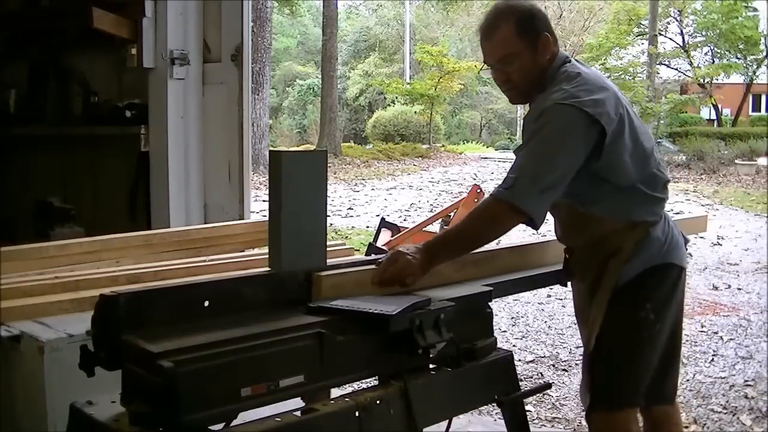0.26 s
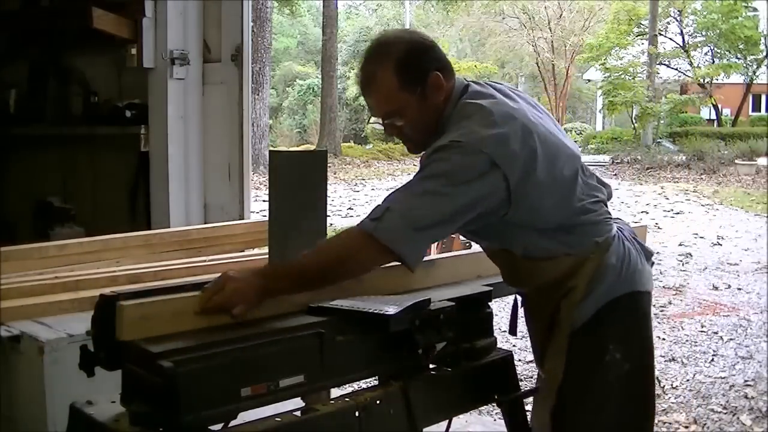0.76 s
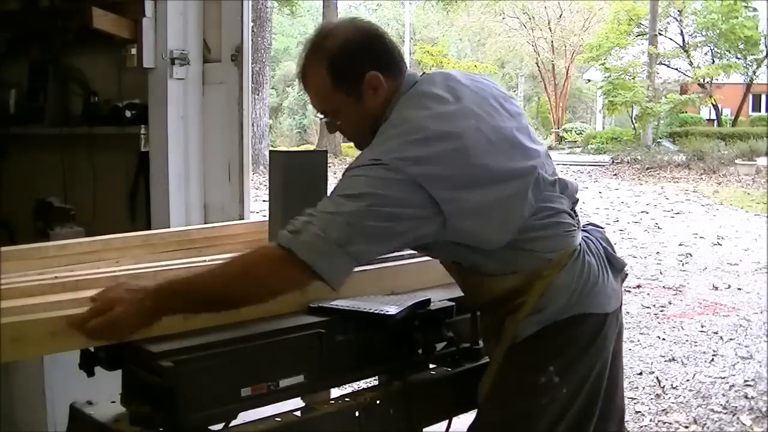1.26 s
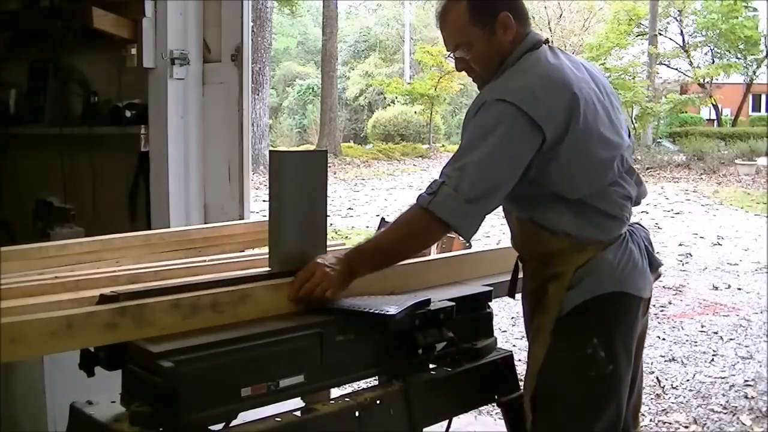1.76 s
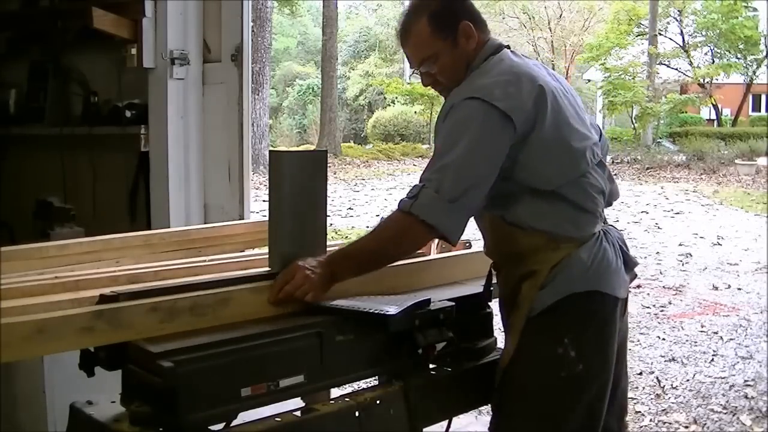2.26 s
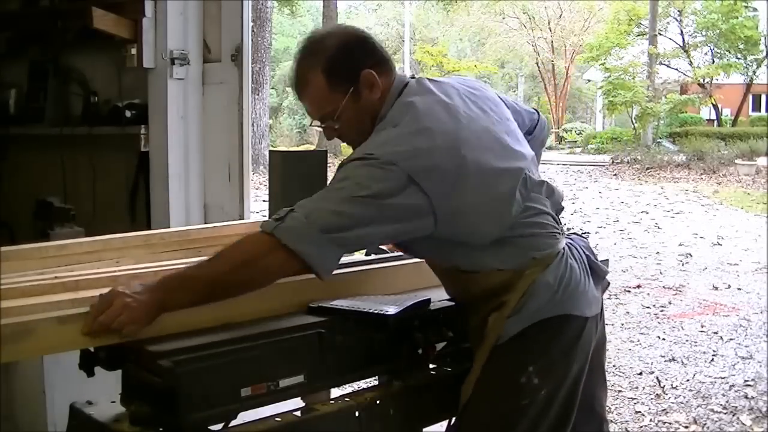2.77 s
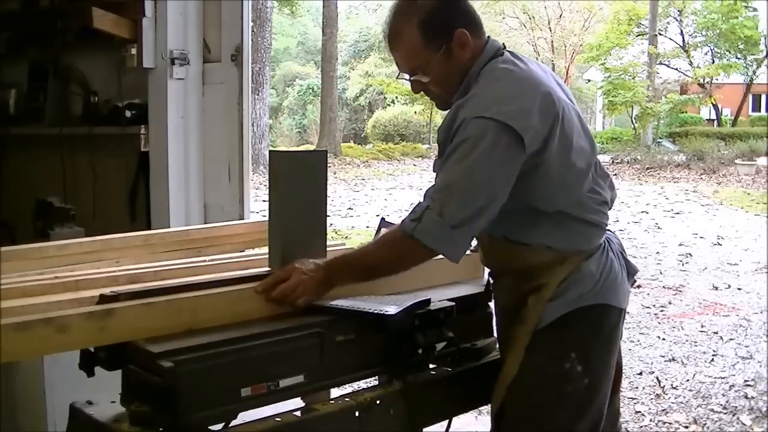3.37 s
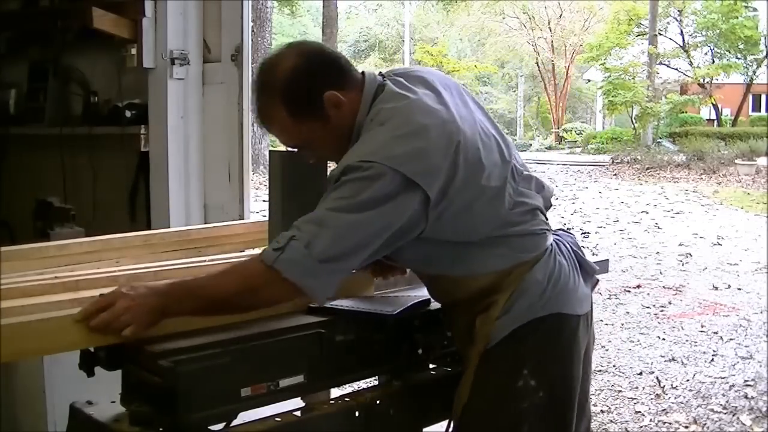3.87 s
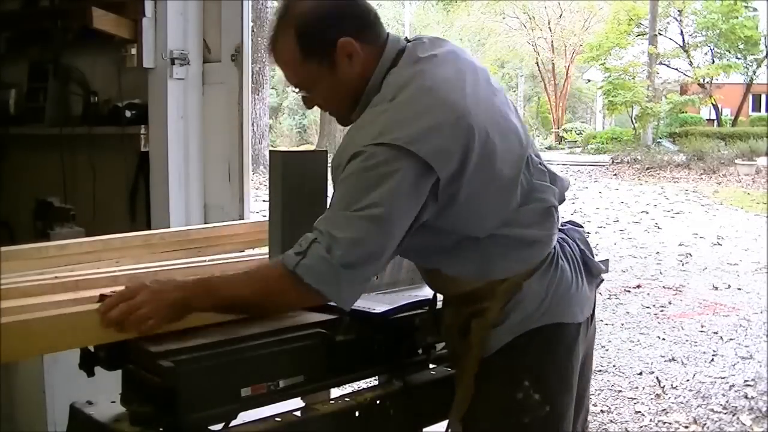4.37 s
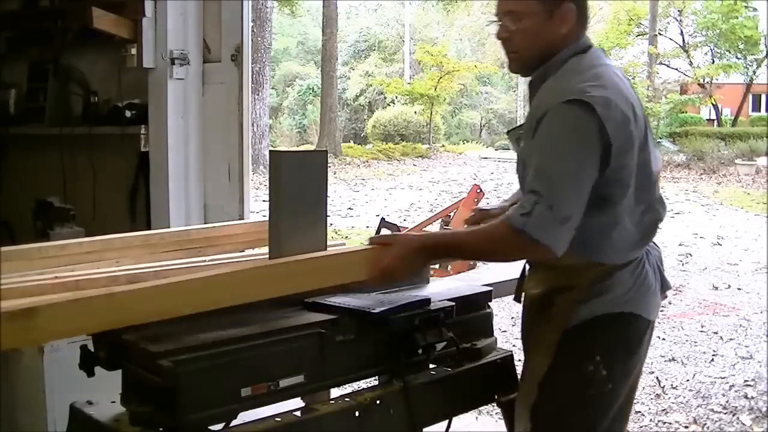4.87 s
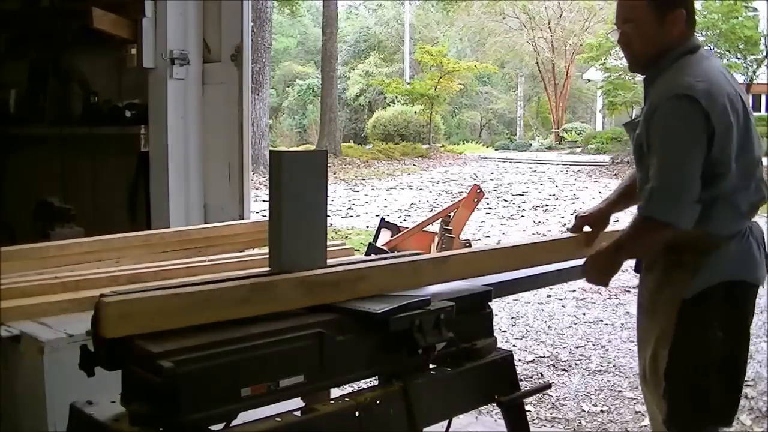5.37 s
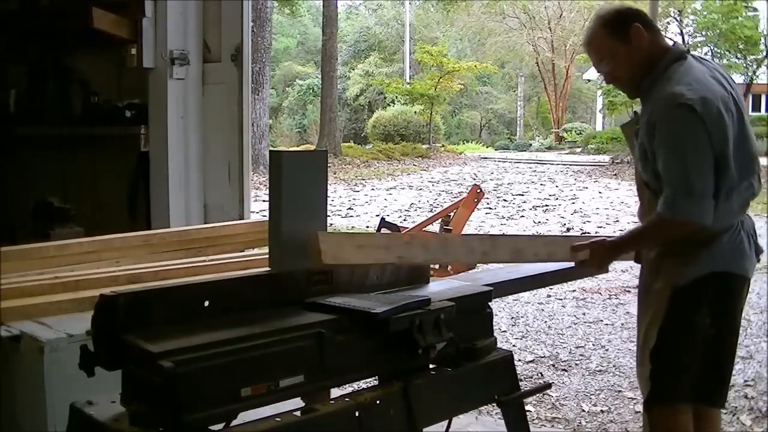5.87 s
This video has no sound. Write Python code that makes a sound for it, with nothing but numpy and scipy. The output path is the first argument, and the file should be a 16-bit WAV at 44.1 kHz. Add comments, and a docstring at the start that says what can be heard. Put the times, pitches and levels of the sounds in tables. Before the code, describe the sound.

A jointer whines steadily in an open shed while a long board is pushed over its knives in three harsh, ringing, hissing cuts, then knocks and scrapes on iron.

```python
"""Jointer planing a long board

A belt-driven jointer with a three-knife head whines in an open shed: tones locked to the head over filtered noise.
A board is fed in three pushes that sag the speed; knife blows drive board ring, chip spray, singing and snaps.
Afterwards the lifted board squeaks, knocks and scrapes on the iron table: band noise and decaying modes.
The recorder's limiter pulls the whine down under sharp ticks and knocks."""
import sys
import numpy as np
from scipy import signal
from scipy.fft import rfft, irfft
from scipy.io import wavfile
from scipy.ndimage import uniform_filter1d

SR = 44100
rng = np.random.default_rng(int(sys.argv[2]) if len(sys.argv) > 2 else 0)


def inscribe(sig):
    """Save sig as 16-bit PCM at rate SR to the path in sys.argv[1].

    A 1-D sig is mono; a 2-D sig holds one channel per row.
    Samples are clipped to [-1, 1] before scaling.
    """
    pcm = np.round(np.clip(np.atleast_2d(sig).T, -1, 1) * 32767)
    wavfile.write(sys.argv[1], SR, pcm.astype(np.int16))


N = 269451


def amp(db):
    """Gain of a level in dB."""
    return 10 ** (np.asarray(db) / 20)


def evened(x):
    """Scales to an rms of one."""
    return x / np.sqrt(np.mean(x ** 2) + 1e-20)


def wander(count, size):
    """Slow random drift of unit rms: noise averaged over size samples."""
    return evened(uniform_filter1d(rng.standard_normal(count), size=size))


def curve(rows, outside=None):
    """Interpolates the columns of a table to one value a sample."""
    s, *columns = np.transpose(rows)
    t = np.arange(N) / SR
    return [np.interp(t, s, column, outside, outside) for column in columns]


def lift(hz, modes):
    """The dB that a set of modes adds at each frequency."""
    return sum(up_db / (1 + (2 * (hz - mode_hz) / width_hz) ** 2) for mode_hz, width_hz, up_db in modes)


def coloured(x, points, patch_db, size, modes=()):
    """Filters by a spectrum and modes, overlaid with random patches of size (bins, frames)."""
    hz, _, z = signal.stft(x, SR, nperseg=1024, noverlap=768)
    f, db = np.transpose(points)
    shape_db = np.interp(np.log(hz + 1), np.log(f), db) + lift(hz, modes)
    patches = uniform_filter1d(rng.standard_normal(z.shape), size[0], axis=0)
    patches = evened(uniform_filter1d(patches, size[1], axis=1))
    z = z * amp(shape_db[:, None] + patch_db * patches)
    return evened(signal.istft(z, SR, nperseg=1024, noverlap=768)[1][:N])


def band(x, lo_hz, hi_hz):
    """Second-order band-pass design."""
    return signal.sosfilt(signal.butter(2, [lo_hz, hi_hz], "band", fs=SR, output="sos"), x)


def add(mix, s, sound):
    """Mixes a sound in at second s."""
    part = mix[round(s * SR):][:len(sound)]
    part += sound[:len(part)]


def stretch(s, length_s):
    """Sample range starting at second s."""
    return slice(round(s * SR), round((s + length_s) * SR))


# knife whine, 6 x head speed: t/s, f/Hz
WHINE_HZ = [(0, 907.99), (0.28, 904.73), (0.4, 896.85), (0.75, 890.77), (1.1, 893.39), (1.32, 905.24),
            (2.2, 904.52), (2.3, 897.79), (2.5, 897.28), (2.78, 891.28), (3.02, 906.3), (3.4, 904.13),
            (3.5, 896.63), (3.82, 892.04), (4.1, 896.45), (4.2, 907.25), (4.4, 906.2), (6.11, 906.31)]
BELT_TURNS, BELT_WOBBLE_TURNS = 9.225, .0165  # head turns a lap; lead and lag of the head
HEAD_START_TURNS, BELT_START_LAPS = .44, -.18


def head():
    """Head turns and belt angle in rad; the belt joint hurries and slows the head once a lap."""
    turns = np.cumsum(curve(WHINE_HZ)[0]) / (6 * SR)
    lap = 2 * np.pi * (turns / BELT_TURNS + BELT_START_LAPS)
    return HEAD_START_TURNS + turns + BELT_WOBBLE_TURNS * np.sin(lap), lap


# head tones: multiple of head speed, level/dB re WHINE_DB
HEAD_ORDERS = [(1, -44), (2, -32), (3, -13), (4, -27.5), (5, -22), (6, 1.5), (7, -34), (8, -26.5), (9, -13),
               (10, -18.5), (11, -23.5), (12, -15), (13, -33.5), (14, -20.5), (15, -18), (16, -19),
               (17, -20), (18, -19.5), (19, -24.5), (20, -31), (21, -20), (22, -59), (23, -28), (24, -43.5)]
# swell once a belt lap: multiple of head speed: depth (negative = against the hurry)
ORDER_THROBS = {3: 0.15, 6: 0.17, 7: 0.37, 9: -0.46}
# motor tones: f/Hz, level/dB re WHINE_DB
MOTOR_TONES = [(129, -46.5), (242, -36.5), (592, -20.5), (829, -21.5), (1001, -18.5), (1072, -21),
               (1184, -26)]
# spectrum of motor roar and stirred air: f/Hz, relative level/dB per Hz
AIR_SPECTRUM = [(90, -65.5), (150, -38), (300, -24.5), (400, -22), (520, -15), (800, -13.5), (1000, -10),
                (1300, -14), (2300, -15), (3400, -19), (8300, -23), (15500, -28.5)]
WHINE_DB = -15
COVER_DB = -0.5  # board over the knives muffles the roar


def idle(turns, lap):
    """Tones of head and motor, each a little unsteady, over the roar of motor and air."""
    partials = [(k * turns, db, ORDER_THROBS.get(k, 0)) for k, db in HEAD_ORDERS]
    partials += [(hz * np.arange(N) / SR, db, 0) for hz, db in MOTOR_TONES]
    tones = np.zeros(N)
    for cycles, db, depth in partials:
        waver = 1 + depth * np.cos(lap) + 0.19 * wander(N, 1500)
        tones += amp(db) * waver * np.sqrt(2) * np.cos(2 * np.pi * (cycles + rng.random()))
    chop = 1 + 0.05 * np.cos(2 * np.pi * turns)  # the knives chop the air
    roar = coloured(chop * rng.standard_normal(N), AIR_SPECTRUM, patch_db=2.5, size=(10, 12))
    covered = curve([(FEED_ROWS[0][0], 1), (FEED_END_S, 1)], 0)[0]
    covered = uniform_filter1d(covered, size=2000)
    return amp(WHINE_DB) * (tones + amp(-3.5 + COVER_DB * covered) * roar)


# wood slipping on iron: t/s, level/dB, f/Hz, second f/Hz, rise/s, t60/s
SQUEAK_ROWS = [(.002, -17.5, 7860, 7370, 0.0013, 0.17), (4.626, -23, 14500, 13500, 0.0054, 0.034),
               (4.635, -12.5, 12300, 11030, 0.016, 0.16), (4.769, -14, 9705, 8870, 0.00136, 0.12),
               (4.772, -18.5, 7540, 7240, .002, 0.063), (4.842, -15, 5450, 5450, 0.003, 0.109)]


def squeaks():
    """Short slips of wood on iron: two narrow noise bands over a broader scuff."""
    out, t = np.zeros(N), np.arange(9000) / SR
    for s, db, pitch_hz, second_hz, rise_s, t60_s in SQUEAK_ROWS:
        noise = rng.standard_normal(len(t))
        pair = sum(evened(band(noise, .97 * f, 1.03 * f)) for f in (pitch_hz, second_hz))
        scuff = .5 * evened(band(noise, .7 * second_hz, min(1.3 * pitch_hz, 16000)))
        swell = np.where(t < rise_s, t / rise_s, amp(-60 * (t - rise_s) / t60_s))
        add(out, s, amp(db) * (pair + scuff) * swell)
    return out


# board against a running tone of the head: t/s, length/s, multiple of head speed, level/dB
SING_ROWS = [(0.293, 0.078, 12, -15), (0.304, 0.1, 27, -12.5), (0.282, 0.093, 33, -17),
             (0.278, .06, 36, -20), (0.427, .12, 41, -19.5), (0.475, 0.12, 32, -18), (.8, 0.21, 18, -14.5),
             (0.387, 0.21, 18, -13), (0.43, 0.2, 23, -14.5), (0.583, 0.158, 15, -9.5),
             (0.611, 0.057, 18, -14.5), (0.643, 0.1, 41, -18), (0.694, 0.048, 32, -8),
             (0.752, 0.098, 23, -16), (0.888, 0.2, 32, -18), (0.895, 0.12, 15, -18),
             (0.975, 0.175, 29, -18), (1.055, 0.23, 23, -11), (1.452, 0.029, 16, -17),
             (2.38, 0.324, 32, -20), (2.41, 0.172, 23, -12), (2.542, 0.057, 18, -17),
             (3.077, 0.36, 15, -22.5), (3.402, 0.19, 23, -12), (3.704, 0.0454, 15, -11),
             (3.706, 0.0616, 18, -11), (3.754, 0.087, 23, -11.5), (4.0, 0.12, 15, -16),
             (4.04, 0.096, 17, -15)]


def sings(turns):
    """A head tone meets a mode of the sliding board and sings out, fluttering."""
    out = np.zeros(N)
    for s, length_s, k, db in SING_ROWS:
        span = stretch(s, length_s)
        flutter = 1 + .2 * wander(len(turns[span]), 300)
        swell = flutter * signal.windows.tukey(len(flutter), .6)
        out[span] += amp(db) * np.sqrt(2) * swell * np.cos(2 * np.pi * k * turns[span])
    return out


# pushes and rests, each until the next:
# t/s, ring level/dB at start, at end, spray level/dB at start, at end, share of the proud knife/0-1
FEED_ROWS = [(.285, -8, -3, -6, -4.5, 0.39), (1.08, -9, -7.5, 1.5, -3.5, 0.7),
             (1.223, -16, -14.5, -17, -25, 0.64), (2.218, -7, -4.5, -2.5, -4, 0.63),
             (2.915, -16.5, -11.5, -20.5, -17.5, 0.73), (3.415, -4.5, -6, -2, -6, 0.56)]
FEED_END_S, BITE_S, EASE_S = 4.135, 0.022, 0.0413  # board leaves the knives; push bites; push eases off


def feed():
    """Board ring dB, spray dB and proud-knife share as the push bites and eases off."""
    rows = [(FEED_ROWS[0][0], -24, -24, FEED_ROWS[0][-1])]
    ends = [row[0] for row in FEED_ROWS[1:]] + [FEED_END_S]
    for (s, ring_db, ring_end_db, spray_db, spray_end_db, proud), end in zip(FEED_ROWS, ends):
        change_s = BITE_S if spray_db > rows[-1][2] else EASE_S
        rows += [(s + change_s, ring_db, spray_db, proud), (end, ring_end_db, spray_end_db, proud)]
    return curve(rows + [(FEED_END_S + BITE_S, -45, -45, proud)], -90)


def knife_passes(turns):
    """Samples of the three knife passes a turn, and which are the proud knife's."""
    passes = np.floor(3 * turns)
    at = np.flatnonzero(np.diff(passes)) + 1
    return at, passes[at] % 3 == 0


def ticks_and_chips(ticks, proud):
    """Ticks that start bright, a puff of chips after each, and steady noise as the knives share the cut."""
    t = np.arange(300) / SR
    chips = signal.oaconvolve(ticks, amp(-60 * t / 0.0074))[:N] * rng.standard_normal(N)
    steady = np.sqrt(uniform_filter1d(ticks ** 2, size=2000) + 1e-9)
    crack = signal.chirp(t[:24], 15000, t[23], 5000) * np.hanning(24)
    cracks = signal.oaconvolve(ticks, crack / np.linalg.norm(crack))[:N]
    even = 1.4 - proud
    spray = (0.95 * cracks + 0.64 * chips) / steady + even * rng.standard_normal(N)
    return spray / np.sqrt(1 + even ** 2)


# light cut exciting a fixed band of the machine: t/s, length/s, f/Hz, width/Hz, level/dB
SCREECH_ROWS = [(1.4, .84, 5380, 200, -28), (3.05, .4, 5380, 260, -28), (1.36, .2, 11800, 1200, -26),
                (1.5, .22, 10700, 1000, -27), (3.1, .3, 11200, 1200, -29)]


def screeches(excitation):
    """Fixed machine bands rung by the cut."""
    out = np.zeros(N)
    for s, length_s, hz, width_hz, db in SCREECH_ROWS:
        span = stretch(s, length_s)
        rung = evened(band(excitation[span], hz - width_hz / 2, hz + width_hz / 2))
        out[span] += amp(db) * rung * signal.windows.tukey(len(rung), .4)
    return out


# spectrum of the ringing board: f/Hz, relative level/dB per Hz
BOARD_SPECTRUM = [(600, -29), (1100, -9), (1500, -2.5), (2100, 0), (3300, -3), (5500, -5.5), (9000, -10.5),
                  (12000, -10)]
# spectrum of ticks and chips: f/Hz, relative level/dB per Hz
SPRAY_SPECTRUM = [(2400, -44), (4000, -31), (6000, -6.5), (9000, 0), (10500, -3), (12800, 4), (14500, -4.5),
                  (16000, -2.5)]
# modes of table, fence and board: f/Hz, width/Hz, level/dB
BLOW_MODES = [(2180, 240, 2.5), (2725, 500, 2.5), (3354, 40, 13), (3867, 140, 5), (4610, 230, 2),
              (5460, 183, 5.5)]


def cut(turns):
    """Three knife blows a turn, one knife proud, ring the board and throw chips."""
    ring_db, spray_db, proud = feed()
    proud = np.clip(proud, 0, 1)
    at, first = knife_passes(turns)
    luck = rng.standard_normal((len(at), 2))
    blows, ticks = np.zeros((2, N))
    blows[at] = np.where(first, 1, .2) * amp(2 * luck[:, 0])
    ticks[at] = np.where(first, 1, 1 - proud[at]) * amp(2 * luck[:, 1])
    spray = ticks_and_chips(ticks, proud)
    spread = irfft(np.exp(2j * np.pi * rng.random(129)))  # wood scatters a blow over some ms
    rattle = evened(signal.oaconvolve(blows, spread)[:N]) + .45 * rng.standard_normal(N)
    ring = coloured(rattle, BOARD_SPECTRUM, patch_db=3.5, size=(3, 20), modes=BLOW_MODES)
    hiss = coloured(spray, SPRAY_SPECTRUM, patch_db=1.2, size=(12, 30))
    return amp(ring_db) * ring + amp(spray_db) * hiss + screeches(rattle + spray)


# hard grain: t/s, level/dB
SNAP_ROWS = [(.745, 8), (.944, 2.5), (1.092, 11), (1.193, 18), (1.22, 10), (2.227, 13), (2.241, 14.5),
             (2.254, 11), (2.288, 15), (2.361, 13), (2.408, 19), (2.495, 11), (2.508, 17), (2.569, 15),
             (2.615, 21), (2.621, 23), (2.817, 17.5), (2.911, 7), (3.429, 5), (3.496, 18), (3.576, 16),
             (3.617, 16.5), (3.697, 15.5), (3.757, 11), (3.771, 18.5), (3.805, 17.5), (3.905, 12),
             (4.127, 8)]


def snaps(turns):
    """Hard grain makes a knife snap: decaying band noise on the nearest pass of the proud knife."""
    out, t = np.zeros(N), np.arange(300) / SR
    at, first = knife_passes(turns)
    proud_at = at[first]
    for s, db in SNAP_ROWS:
        nearest = proud_at[np.argmin(abs(proud_at - s * SR))]
        snap = band(rng.standard_normal(len(t)) * amp(-60 * t / .002), 9000, 15700)
        add(out, nearest / SR, amp(db) * 2 * snap / np.linalg.norm(snap))
    return out


# board against iron: t/s, level/dB, tilt/dB per octave, t60/s, clack level/dB
KNOCK_ROWS = [(4.3505, 3, -2, 0.108, 8.5), (4.842, -11.5, 1, 0.15, -14), (5.2, -5, 0, 0.21, -6),
              (5.222, -8.5, -3.5, 0.084, -14), (5.32, -5, -.5, 0.185, -8), (5.444, -11, -1, 0.12, -15),
              (5.475, -11.5, -0.5, 0.135, -20.5)]
# modes of the struck board: f/Hz, level/dB, t60/s
CLACK_MODES = [(1950, -3, .008), (2800, -3, .007)]


def knocks():
    """Board bumps on iron: a wooden clack of decaying modes and a noisy two-stage tail."""
    out, t = np.zeros(N), np.arange(9000) / SR
    hz = np.fft.rfftfreq(len(t), 1 / SR) + 1
    clack = sum(amp(db - 60 * t / t60_s) * np.sin(2 * np.pi * f * t) for f, db, t60_s in CLACK_MODES)
    for s, db, tilt_db, t60_s, clack_db in KNOCK_ROWS:
        colour = amp(tilt_db * np.log2(hz / 4000) + lift(hz, BLOW_MODES))
        colour = colour / np.sqrt(1 + (1400 / hz) ** 8)  # low cut
        noise = evened(irfft(rfft(rng.standard_normal(len(t))) * colour))
        fade = (amp(-60 * t / t60_s) + .3 * amp(-60 * t / .15)) * np.minimum(t / .001, 1)
        add(out, s, amp(db) * noise * fade + amp(clack_db) * clack)
    return out


# board over the table: t/s, low rasp level/dB, high hiss level/dB
DRAG_ROWS = [(4.88, -27, -24), (4.948, -15, -17.5), (4.974, -21, -22), (5.05, -15, -28),
             (5.066, -17.5, -17.5), (5.194, -36.5, -34), (5.2, -30, -18.5)]
# ringing of the dragged board: f/Hz, width/Hz, level/dB
RASP_BANDS = [(2150, 500, 0), (3900, 600, -8)]


def drag():
    """The board drags over the table: uneven grit noise in low rasp and high hiss bands."""
    rasp_db, hiss_db = curve(DRAG_ROWS, -90)
    grit = rng.standard_normal(N) * (1 + 0.28 * wander(N, 300))
    rasp = sum(amp(db) * evened(band(grit, f - width_hz / 2, f + width_hz / 2)) for f, width_hz, db in RASP_BANDS)
    hiss = evened(band(grit, 8000, 14000)) + .25 * evened(band(grit, 8800, 9700))
    return amp(rasp_db) * rasp + amp(hiss_db) * hiss


def shed(x):
    """Sparse echoes of random sign from walls and stacked timber."""
    at = np.arange(200, 12000, 20) + rng.integers(0, 20, 590)
    taps = np.zeros(12100)
    taps[at] = rng.choice([-1., 1.], len(at)) * amp(-60 * at / SR / 0.12)  # t60 0.12 s
    return signal.oaconvolve(x, taps / np.linalg.norm(taps))[:N]


def scene():
    """Machine, cut and handling in the shed."""
    turns, lap = head()
    cutting = cut(turns) + sings(turns) + snaps(turns)
    moving = squeaks() + knocks() + drag()
    echoes = shed(amp(-9) * cutting + amp(-16) * moving)
    return (idle(turns, lap) + cutting + moving + echoes)[None]


def settle(x, seconds):
    """One-pole smoothing."""
    keep = np.exp(-1 / (seconds * SR))
    return signal.lfilter([1 - keep], [1, -keep], x)


CEILING_DB, HEAR_S, CLAMP_S, RECOVER_DB_PER_S = -15, 0.00057, 0.0015, 67
CORNER_HZ, DEAF_SHARE = 2300, 0.39  # the limiter hears less below the corner
EDGE_HZ = 15750


def record(dry):
    """Small microphone without bass, limiter ducking after sharp peaks, overload, rumble filter, band limit."""
    thin = signal.sosfilt(signal.butter(4, 110, "high", fs=SR, output="sos"), dry)
    heard = thin - DEAF_SHARE * signal.lfilter(*signal.butter(1, CORNER_HZ, fs=SR), thin)
    level_db = 10 * np.log10(settle(heard ** 2, HEAR_S) + 1e-18)
    fall_db = np.arange(N) * RECOVER_DB_PER_S / SR
    held_db = np.maximum.accumulate(level_db + fall_db, axis=1) - fall_db  # peak hold, linear fall in dB
    duck_db = settle(np.maximum(held_db - CEILING_DB, 0), CLAMP_S)
    clipped = np.clip(thin / amp(duck_db), -1, 1)
    cut_low = signal.sosfilt(signal.butter(2, 90, "high", fs=SR, output="sos"), clipped)
    edge = signal.firwin(511, EDGE_HZ, window=("kaiser", 9), fs=SR)
    return signal.oaconvolve(cut_low, edge[None], "same")


dry = scene()
out = record(dry)
inscribe(out)
```